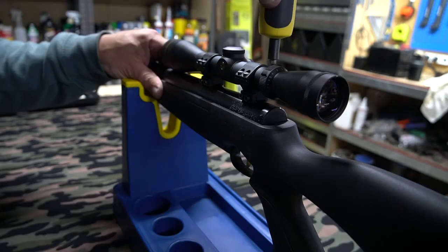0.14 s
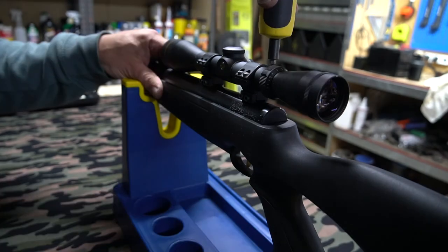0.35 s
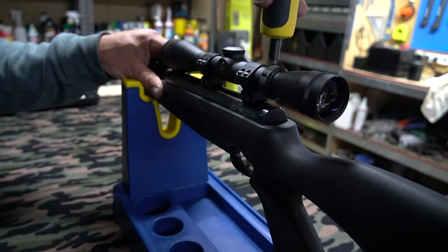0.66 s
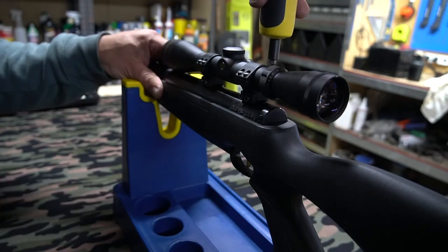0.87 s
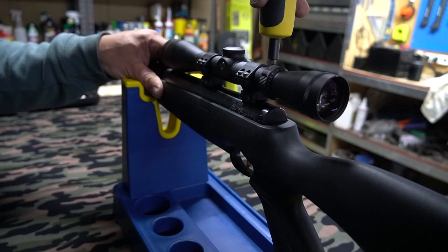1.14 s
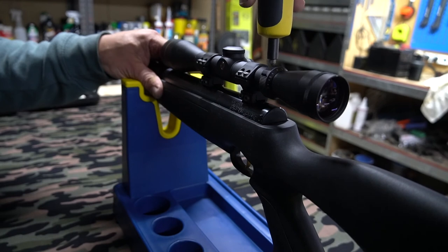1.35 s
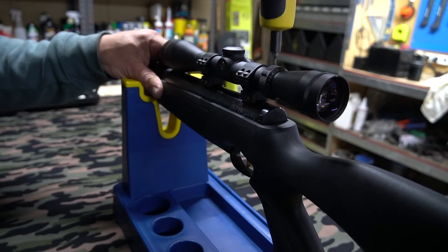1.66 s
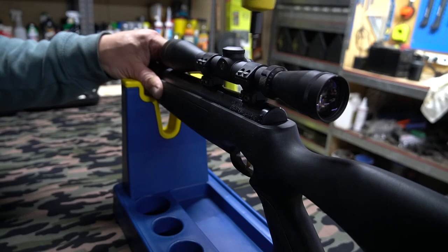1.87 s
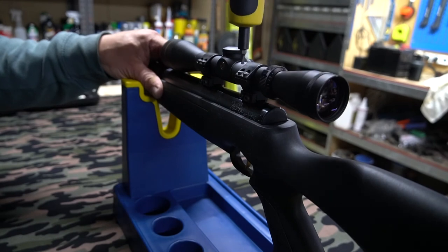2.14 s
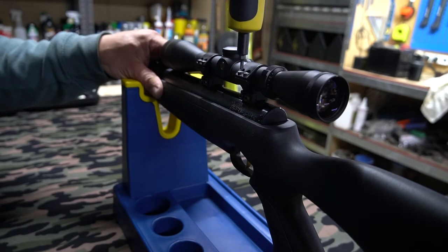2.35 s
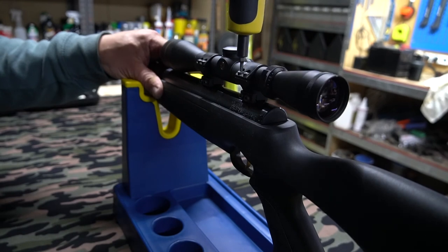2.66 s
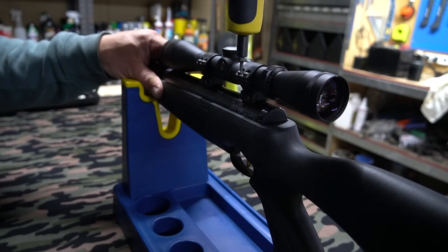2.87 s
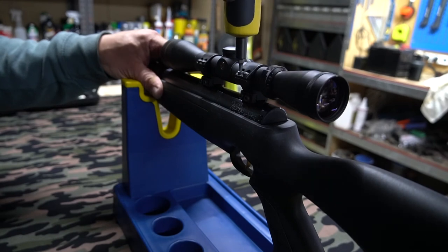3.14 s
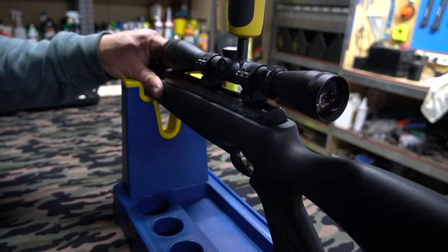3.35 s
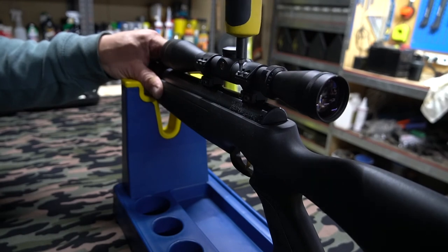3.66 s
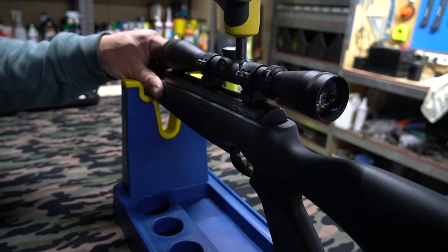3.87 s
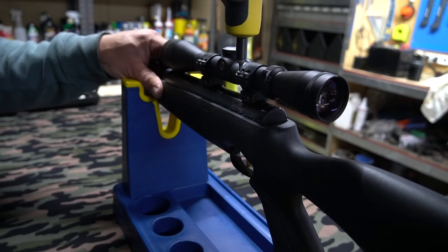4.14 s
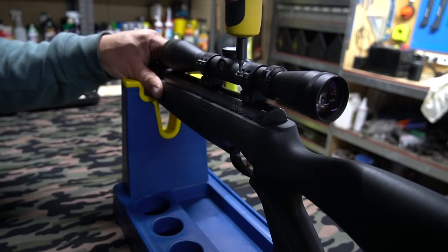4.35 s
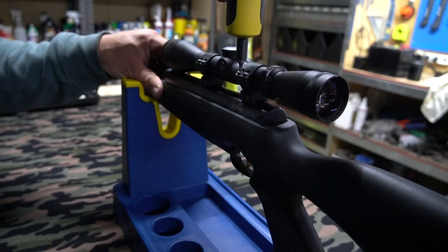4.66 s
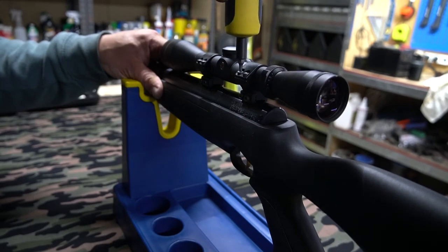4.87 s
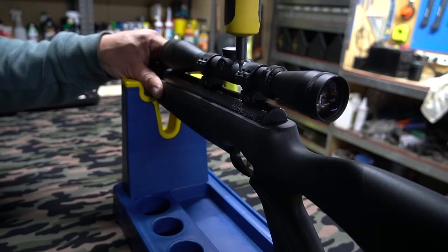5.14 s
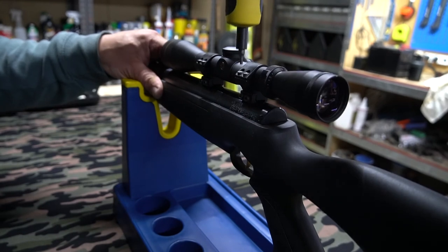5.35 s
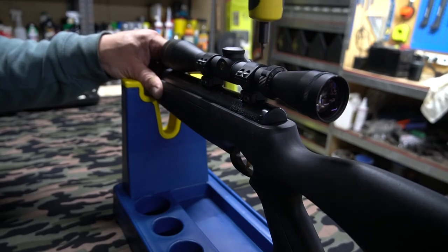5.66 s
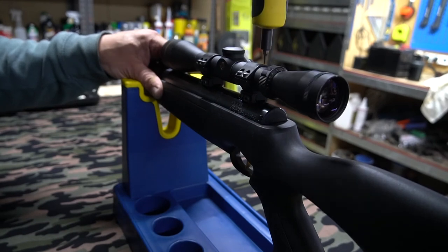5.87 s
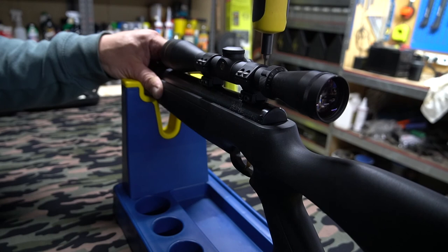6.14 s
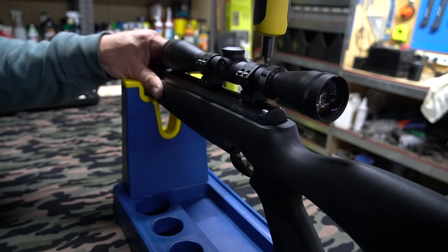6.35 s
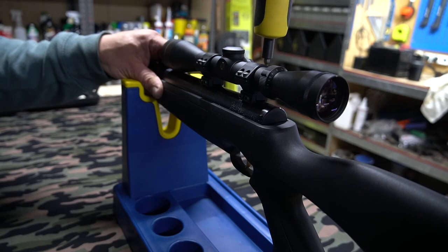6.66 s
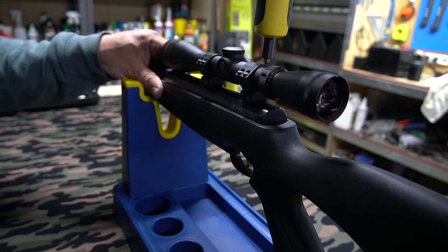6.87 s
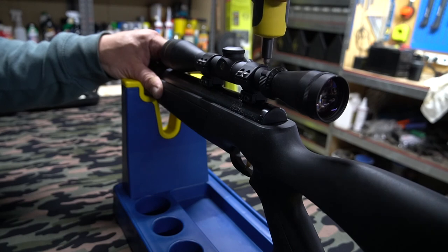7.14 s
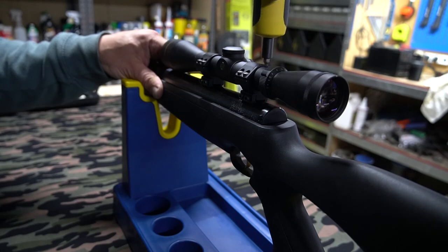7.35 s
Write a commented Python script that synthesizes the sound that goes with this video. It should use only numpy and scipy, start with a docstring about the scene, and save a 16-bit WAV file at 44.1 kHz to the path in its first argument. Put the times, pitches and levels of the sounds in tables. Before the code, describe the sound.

Two sharp, hard metallic clicks about four seconds apart, with light tool taps, low handling rumble and quiet workshop air around them.

```python
"""A small workshop: a torque screwdriver tightens two scope-ring screws on a rifle in a plastic rest on a bench.
Twice its clutch snaps over: cracks and damped modes ring the metal parts and jolt stock, rest and bench.
Around the snaps the bit ticks, pings and knocks as noise bursts and modes; the hand rumbles and rubs as
swelling noise. A noise reverberation answers, over room air, faint hiss and three distant gliding chirps."""
import sys
import numpy as np
from scipy import signal
from scipy.fft import rfft, irfft, next_fast_len
from scipy.io import wavfile

SR = 44100
rng = np.random.default_rng(int(sys.argv[2]) if len(sys.argv) > 2 else 0)


def master_out(mix):
    """Clip the mix to full scale and print it as 16-bit PCM to the path in sys.argv[1]."""
    frames = np.transpose(np.atleast_2d(mix))
    ceiling = np.clip(frames, -1, 1)
    pcm = np.round(ceiling * 32767).astype(np.int16)
    wavfile.write(sys.argv[1], SR, pcm)


N = 331191
TIME = np.arange(N) / SR
AGE = np.arange(SR) / SR  # time since a blow [s]
TOP_HZ = 15600  # upper limit of the recorder and of the ticks' low-pass

# clutch breaking over: (time [s], snap level [dB], rebound relative to snap [dB], knock level [dB])
SNAPS = [(.7375, -0.5, -10.5, -20), (4.5312, 0.5, -15, -22.3)]
# bit striking a screw, a ring or the stock:
# (time [s], tick level [dB], brightness [Hz], ping pitch [Hz], ping level [dB], knock level [dB])
TAPS = [(.572, -38.5, 10970, 600, -56, -38), (1.613, -46, 4600, 2510, -54, -36),
        (2.561, -55, 3220, 910, -61.5, -43.5), (2.984, -44.5, 10890, 266, -48.5, -33.5),
        (3.171, -24, 3500, 950, -44.5, -18), (3.524, -50.5, 7040, 4300, -66.5, -36),
        (4.327, -75, 1500, 620, -62, -41.5), (4.474, -72, 1500, 520, -62, -38.5),
        (5.241, -53, 4000, 650, -74, -38.5), (6.3157, -47.5, 4600, 3040, -72.5, -50.5),
        (6.333, -49, 4370, 1000, -56, -39), (6.65, -52.5, 10950, 2870, -72, -45),
        (6.757, -55, 7000, 4400, -63.5, -57.5), (6.779, -44, 2280, 430, -48.5, -35.5),
        (6.838, -56, 7900, 2800, -75, -58.5), (7.0749, -51.5, 5800, 254, -49.5, -38)]


def undb(db):
    """Decibels to gain."""
    return 10 ** (np.asarray(db) / 20)


def fade(t60):
    """Exponential decay after a blow, falling 60 dB in t60 seconds."""
    return np.exp(-np.log(1000) * AGE / t60)


def swell(rise_s):
    """Build-up of a vibration that has to spread first."""
    return 1 - np.exp(-AGE / rise_s)


def ring(modes):
    """Damped sines set off together, as a struck body vibrates in its modes."""
    total = 0
    for hz, db, t60 in modes:
        total = total + undb(db) * fade(t60) * np.sin(2 * np.pi * hz * AGE)
    return total


def shape(x, colour):
    """Filter with a spectrum of (frequency [Hz], level [dB]) points."""
    hz, db = np.transpose(colour)
    f = np.maximum(np.fft.rfftfreq(len(x), 1 / SR), 1)
    gain = undb(np.interp(np.log(f), np.log(hz), db))
    return irfft(rfft(x) * gain, len(x))


def noise(colour, size):
    """Noise of rms 1 with a spectrum of (frequency [Hz], level [dB]) points."""
    y = shape(rng.standard_normal(next_fast_len(size)), colour)[:size]
    return y / y.std()


def band(centre_hz, width_hz):
    """Noise of rms 1 in one resonance, whose centre may move."""
    pole = np.exp(-np.pi * width_hz / SR)
    z = rng.standard_normal(N) + 1j * rng.standard_normal(N)
    for _ in range(2):
        z = signal.lfilter([1], [1, -pole], z)
    carrier = np.exp(2j * np.pi * np.cumsum(centre_hz * np.ones(N)) / SR)
    y = np.real(z * carrier)
    return y / y.std()


def soften(x, hz):
    """Steep low-pass."""
    return signal.sosfilt(signal.butter(4, min(hz, TOP_HZ) / (SR / 2), output="sos"), x)


def thin(x, hz):
    """Second-order high-pass: small parts radiate no bass."""
    return signal.sosfilt(signal.butter(2, hz / (SR / 2), "high", output="sos"), x)


def walk(rate):
    """Slow random wander through points of spread 1, rate points per second."""
    points = rng.standard_normal(int(N / SR * rate) + 2)
    return np.interp(TIME * rate, np.arange(len(points)), points)


def add(track, s, sound):
    """Mix a sound into a track at time s."""
    i = max(int(s * SR), 0)
    track[i:i + len(sound)] += sound[:N - i]


def background():
    """Quiet room air with two narrow bands of hiss, one steady in pitch and one gliding."""
    # still air of the workshop: (frequency [Hz], relative level [dB])
    air_colour = [(20, 3), (60, -6), (130, -15.5), (300, -18), (600, -19), (1100, -22.5), (1500, -21),
                  (2000, -24), (2500, -28), (4300, -28.5), (5300, -39), (9000, -40.5), (15500, -43.5)]
    # narrow hiss that rises in pitch, then fades: (time [s], centre [Hz], level [dB])
    hiss_path = [(0, 3440, -78.5), (1.3, 4120, -76.5), (3.2, 4400, -74), (4.4, 4420, -73.5),
                 (5.3, 4198, -90)]
    s, hz, db = np.transpose(hiss_path)
    hiss_hz = np.interp(TIME, s, hz)
    hiss_db = np.interp(TIME, s, db)
    air = undb(-60.5 + .5 * walk(8.2)) * noise(air_colour, N)
    steady_hiss = undb(-69.5 + .7 * walk(5)) * band(1680, 190)
    gliding_hiss = undb(hiss_db) * band(hiss_hz, 560)
    return air + steady_hiss + gliding_hiss


def push(s, length_s, release_s):
    """Effort of the hand: builds up, holds, relaxes."""
    attack_s = 0.032
    rise = np.clip((TIME - s) / attack_s, 0, 1)
    return rise * np.exp(-np.maximum(TIME - s - length_s, 0) / release_s)


def handling():
    """The hand's uneven push shakes the rest as low noise; the turning bit rubs in the screw as bright noise."""
    # the hand leans on the driver: (start [s], end [s])
    lean_spans = [(0, 1.71), (2.9, 5.4), (6.35, 7.45)]
    # twists of the wrist: (time [s], length [s], relative rumble level [dB], relative rubbing level [dB])
    wrist_twists = [(0.56, .14, -45.5, -88), (3.281, 0.12, -40, -75), (3.62, 0.13, -50.5, -77.5),
                    (4.477, .2, -44.5, -93), (6.463, 0.22, -47.5, -92), (6.845, .06, -45, -75),
                    (7.02, .06, -48, -74.5)]
    rumble_release_s, rub_release_s = 0.1, .04
    leaning = sum(push(s, end_s - s, rumble_release_s) for s, end_s in lean_spans)
    shaking = undb(-62) * leaning
    rubbing = undb(-89) * leaning
    for s, length_s, rumble_db, rub_db in wrist_twists:
        # independent efforts add in power
        shaking = np.hypot(shaking, undb(rumble_db) * push(s, length_s, rumble_release_s))
        rubbing = np.hypot(rubbing, undb(rub_db) * push(s, length_s, rub_release_s))
    rumble = band(90, 26) + undb(-5.0) * band(39, 32) + undb(-15.0) * band(260, 90)
    rub = noise([(500, -12), (3000, 8), (10000, -1.5), (15000, -14)], N)
    uneven_rumble = shaking * undb(-4.5 + 2 * walk(4.6)) * rumble
    uneven_rub = rubbing * undb(1.3 * walk(70)) * rub
    return uneven_rumble + uneven_rub


def ticks():
    """The bit meets the work: a sharp tap, duller when the contact is soft, and a ping from the part that was hit."""
    grit_colour = [(200, -11.0), (900, 0), (2500, 2.5), (4300, 1.0), (7000, -13), (11000, -8.5), (15000, -14.5)]
    out = np.zeros(N)
    for s, db, bright_hz, ping_hz, ping_db, _ in TAPS:
        grit = noise(grit_colour, SR)
        tap = soften(grit * (fade(0.009) + undb(-12.5) * fade(0.066)), bright_hz)
        bright_edge = undb(-27.5) * grit * fade(0.01002)
        add(out, s, undb(db) * (tap + bright_edge))
        # a cluster of close modes, too dense to tell apart
        cluster_colour = [(ping_hz * .5, -45), (ping_hz * .88, -5), (ping_hz, 0),
                          (ping_hz * 1.14, -5), (ping_hz * 2.4, -65)]
        cluster = noise(cluster_colour, SR) * fade(0.18)
        add(out, s, undb(ping_db) * cluster * swell(0.0013))
    return out


def knocks():
    """Every blow passes into the stock, then more slowly into the rest and the bench, which booms."""
    # soft bumps of the hand, too dull to tick: (time [s], knock level [dB])
    hand_bumps = [(1.276, -50), (1.46, -50.5), (2.736, -47.5), (3.40, -44.5), (4.03, -51.5), (5.195, -41),
                  (6.546, -37.5), (6.929, -40), (7.37, -47.5)]
    # modes of the hollow stock: (frequency [Hz], relative level [dB], t60 [s])
    stock_modes = [(344, -9, .25), (406, -5, 0.33), (451, -3, 0.5), (576, -4.5, 0.31), (656, -6, 0.11)]
    # the stock's crowd of weaker modes: (frequency [Hz], relative level [dB])
    stock_colour = [(100, -18), (170, 0.5), (280, -5.5), (420, 2.5), (620, -3), (850, -9.5), (1050, -18),
                    (1500, -11), (2500, -27), (6000, -49)]
    # modes of the plastic rest: (frequency [Hz], relative level [dB], t60 [s])
    rest_modes = [(161, -10, 0.55), (179, -7, 0.34), (225.7, 1.5, .29), (266.6, -7.5, 0.28),
                  (292, -8.5, .28)]
    # modes of the bench top: (frequency [Hz], relative level [dB], t60 [s])
    bench_modes = [(36.7, -21, 1), (54.8, -20.5, 1), (85.6, -12, 0.52), (100, 4.5, 0.31),
                   (133.2, -11, 0.42)]
    # the rest rings louder while the bit works on the front ring, close above it
    front_from_s, front_to_s, front_ring_db = 2.2, 5.0, 7
    rest_db = -15  # relative to the knock
    out = np.zeros(N)
    thud = ring(rest_modes) * swell(0.01) ** 2
    boom = ring(bench_modes) * swell(0.02) ** 2
    thud /= np.abs(thud).max()
    boom /= np.abs(boom).max()
    # (blows, share that rings the stock [dB], whether the blow goes through the bit)
    kinds = ((SNAPS, 1.5, True), (TAPS, -15, True), (hand_bumps, -22, False))
    for blows, stock_db, through_bit in kinds:
        for s, *_, db in blows:
            on_front_ring = through_bit and front_from_s < s < front_to_s
            crowd = noise(stock_colour, SR) * (fade(0.051) + undb(-9.0) * fade(0.29))
            stock = swell(0.0039) ** 2 * (crowd + undb(-13.0) * ring(stock_modes))
            add(out, s, undb(db + stock_db) * stock)
            add(out, s, undb(db + rest_db + front_ring_db * on_front_ring) * thud)
            add(out, s, undb(db) * boom)
    return out


def workshop(x):
    """Reverberation: decaying noise, dense early on, whose tail lasts longest in the bass."""
    # the workshop's tail: (band centre [Hz], relative level [dB], t60 [s])
    room_bands = [(200, 1, 0.94), (900, 2.5, 0.29), (2010, -3.5, 0.47), (3260, -3, .54), (4500, -4, .51),
                  (6600, -3.5, .35), (10000, -5, 0.35), (15013, -6, 0.2)]
    hz, db, t60 = np.transpose(room_bands)
    f = np.log(np.maximum(np.fft.rfftfreq(SR, 1 / SR), 1))
    spectrum = rfft(rng.standard_normal(SR))
    response = 0
    # each row of the identity picks one band, crossfading into its neighbours
    for share, band_db, band_t60 in zip(np.eye(len(hz)), db, t60):
        part = irfft(spectrum * np.interp(f, np.log(hz), share), SR)
        early_and_tail = fade(band_t60) + undb(6) * fade(0.12)
        response = response + undb(band_db) * part * early_and_tail
    # silent for 4 ms, then fading in over 4 ms
    response = response * np.clip((AGE - .004) / .004, 0, 1)
    return undb(-39) * signal.fftconvolve(x, response)[:N]


def clutch():
    """The sprung clutch slams into its next notch, rebounds once and rings the metal: (sound ahead, sound all round)."""
    # modes of the clutch: (frequency [Hz], relative level [dB], t60 [s])
    clutch_modes = [(1580, -24.5, 0.004), (2635, -6, 0.018), (3130, -11, 0.016), (3700, -0.5, 0.013),
                    (4470, -9, 0.015), (5594, -12, .009), (9950, -16, 0.0037)]
    # modes of shaft, rings and scope tube: (frequency [Hz], relative level [dB], t60 [s])
    metal_modes = [(1150, 1.26, 0.38), (1275, -7, 0.18), (1702, 4, .29), (2040, 1.5, .33),
                   (2096, -1.5, .42), (2390, -3, 0.27), (2492, 0.5, 0.27), (2817, -1, .3), (3040, -3, .3),
                   (3240, -3, .35), (3430, -2, 0.3), (3750, -5, .35), (3806, -4, .3), (4237, -5, 0.42)]
    # what the snap radiates all round: (frequency [Hz], relative level [dB])
    spread_colour = [(200, -19), (950, -16), (1500, -11.5), (2100, -3.5), (2600, -1.5), (3400, -0.5),
                     (4400, -2.5), (5300, -9), (7500, -17), (10500, -17.5), (15000, -30.5), (17000, -39.5)]
    crack_colour = [(200, -12.5), (1100, -12.5), (3000, 6.5), (6000, 4.5), (11000, -3.0), (16000, -18.5)]
    rebound_s = .0018
    ahead, impulses, metal = np.zeros((3, N))
    for s, db, rebound_db, _ in SNAPS:
        for delay, blow_db in ((0, db), (rebound_s, db + rebound_db)):
            crack = noise(crack_colour, SR) * fade(0.0051)
            add(ahead, s + delay, undb(blow_db) * (ring(clutch_modes) + undb(-5.0) * crack))
        add(impulses, s, undb([db + 25.5]))  # a single sample
        add(metal, s, undb(db - 32.5) * ring(metal_modes) * swell(0.0023))
    # summed over all directions the clutch's peaks and notches even out
    return thin(ahead, 820) + metal, shape(impulses, spread_colour)


def whistle(glide, octave_db):
    """A slightly rough gliding tone with two overtones and some rasp."""
    size = len(glide)
    hz = glide * (1 + .009 * noise([(100, 3), (400, 5), (2000, -36)], size))
    phase = 2 * np.pi * np.cumsum(hz) / SR
    overtones = np.sin(2 * phase) + undb(-17) * np.sin(3 * phase)
    tone = np.sin(phase) + undb(octave_db) * overtones
    rasp = noise([(1500, -10), (2800, 13), (5000, 3), (8000, -24)], size)
    return np.hanning(size) * (tone + undb(-11) * rasp)


def chirps():
    """Each chirp, like a bird outside, is a short falling lead-in note, then a lower one that arches and settles."""
    # (time [s], length [s], pitch [Hz], level [dB], lead-in level [dB])
    chirp_notes = [(2.129, .1, 2470, -69.5, -64.5), (5.6, .115, 2605, -67, -73.5),
                   (7.389, 0.2, 2628, -64.5, -68.5)]
    lead_ahead_s, lead_s = 0.02, 0.034
    lead_from, lead_to = 1.44, 1.28  # multiples of the pitch
    arch_rise = .09  # share of the pitch
    arch_at, arch_width = 0.37, 0.17  # shares of the note's length
    out = np.zeros(N)
    for s, length_s, hz, db, lead_db in chirp_notes:
        lead = hz * np.linspace(lead_from, lead_to, int(lead_s * SR))
        progress = np.linspace(0, 1, int(length_s * SR))
        arch = hz * (1 + arch_rise * np.exp(-((progress - arch_at) / arch_width) ** 2))
        add(out, s - lead_ahead_s, undb(lead_db) * whistle(lead, octave_db=-29))
        add(out, s, undb(db) * whistle(arch, octave_db=-8))
    return out


def scene():
    """Close metal sounds and far chirps with their reverberation, the knocks, the hand and the room."""
    snap, spread = clutch()
    tick, far = ticks(), chirps()
    # the distant chirps reach the room far more strongly than they arrive direct
    reverberation = workshop(spread + tick + undb(15.5) * far)
    mix = snap + tick + far + reverberation + knocks() + handling() + background()
    return mix[None]


def record(dry):
    """The recorder clips peaks beyond full scale, then a steep elliptic low-pass cuts the top."""
    clipped = np.clip(dry, -1, 1)
    return signal.sosfilt(signal.ellip(8, .2, 70, TOP_HZ, fs=SR, output="sos"), clipped)


dry = scene()
out = record(dry)
master_out(out)
```